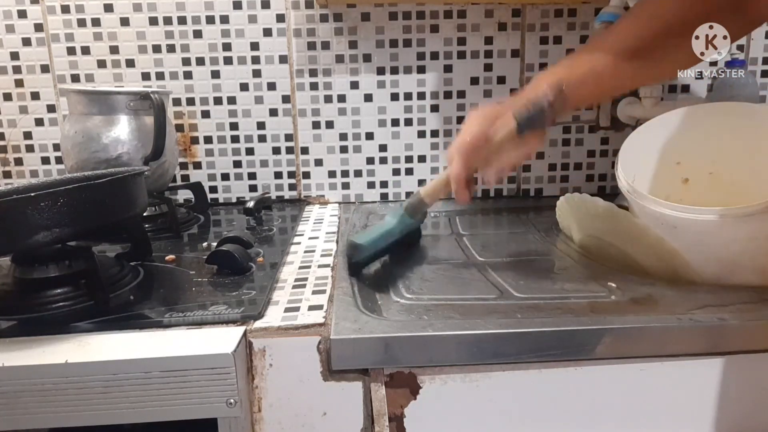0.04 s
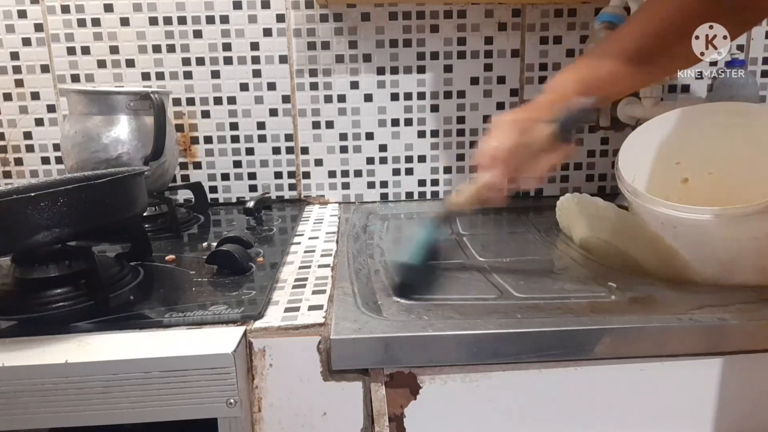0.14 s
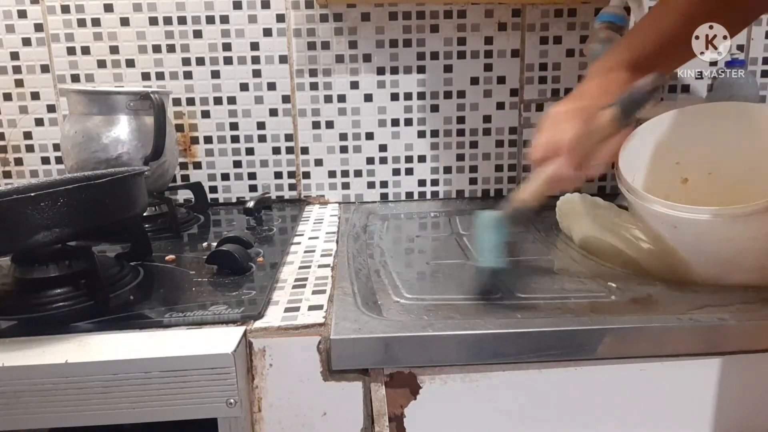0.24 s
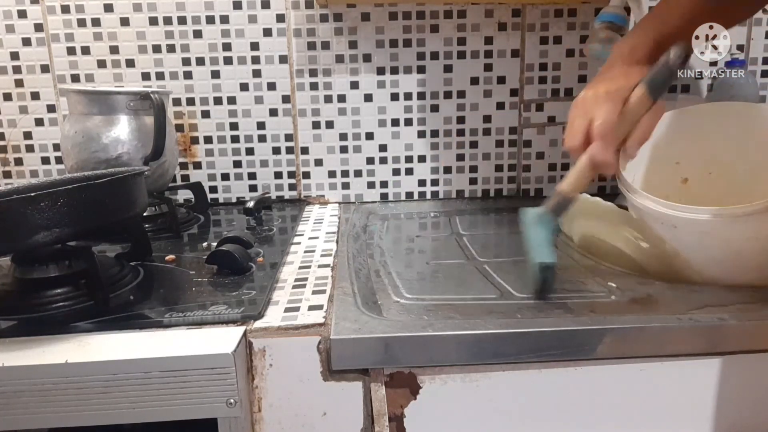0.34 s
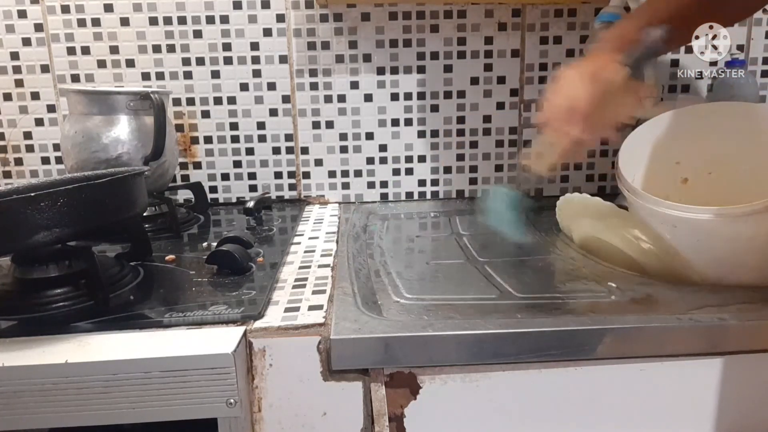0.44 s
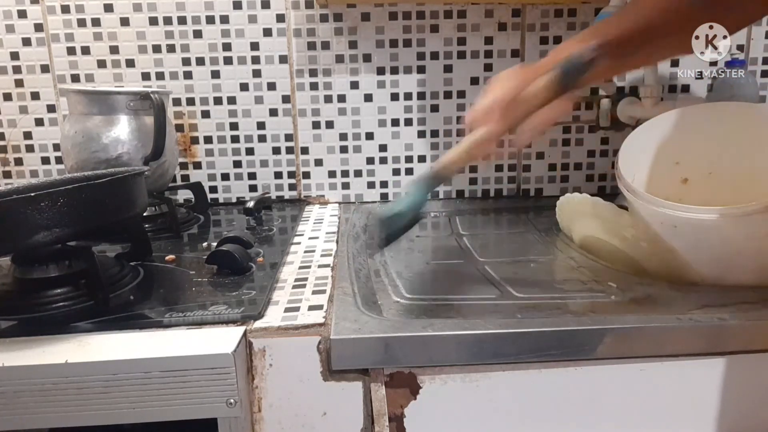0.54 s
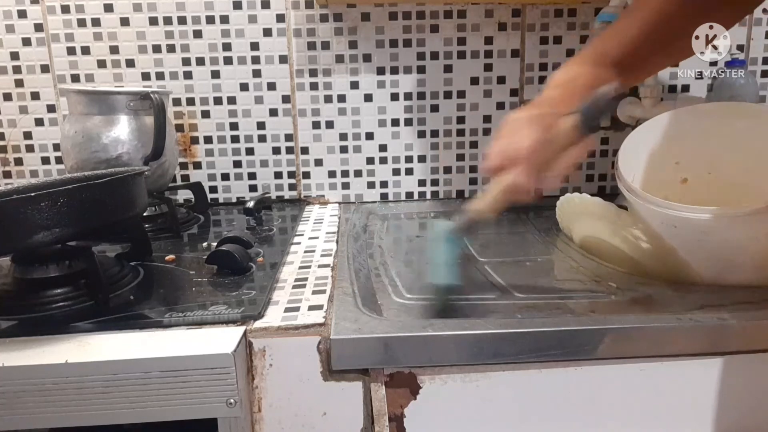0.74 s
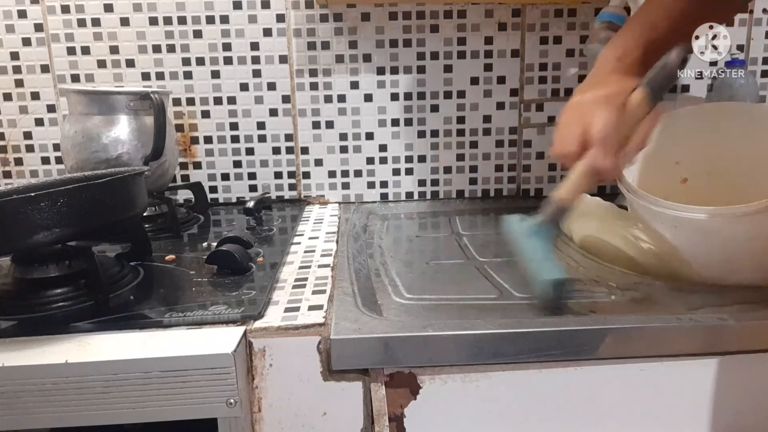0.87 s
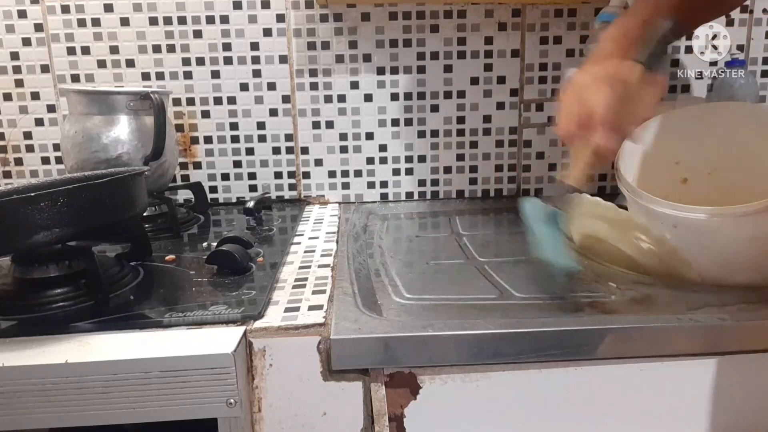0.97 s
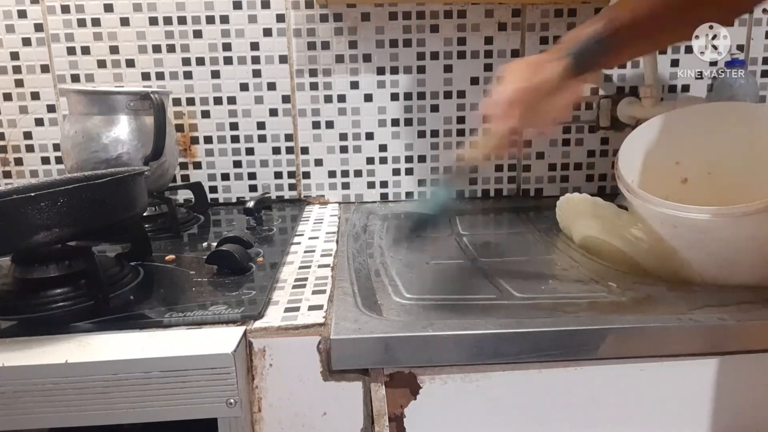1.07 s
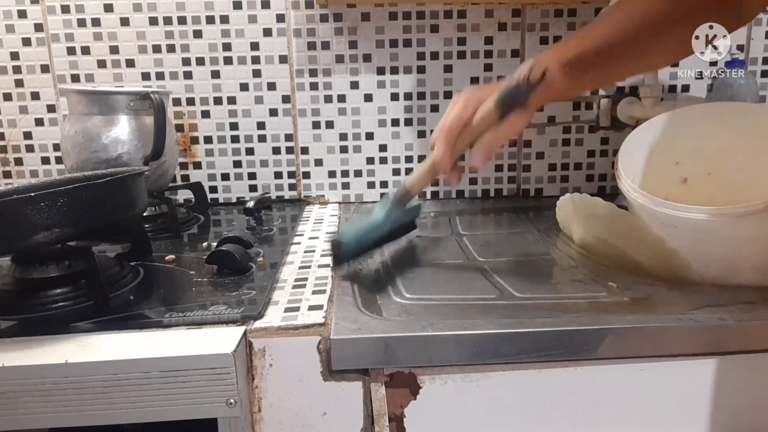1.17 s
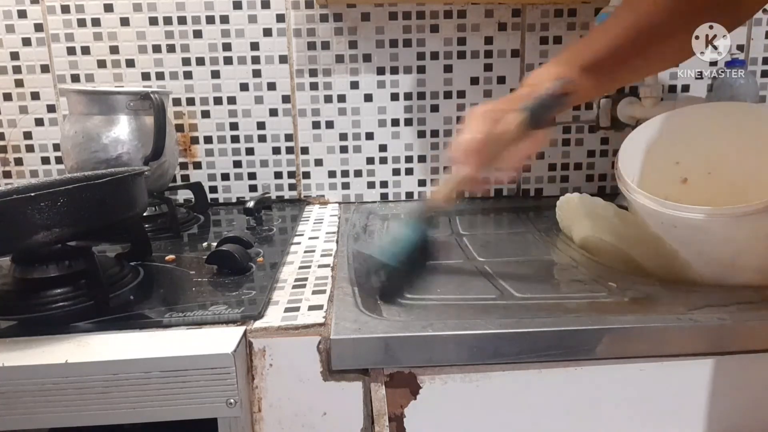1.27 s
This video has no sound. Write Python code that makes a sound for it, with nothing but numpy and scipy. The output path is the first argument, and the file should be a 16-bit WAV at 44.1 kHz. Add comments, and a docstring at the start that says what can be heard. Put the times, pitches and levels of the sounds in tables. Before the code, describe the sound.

Close up in a quiet, hard-walled kitchen, a wet rubber blade gives a lower squeak, stutters over ridged sheet steel, swishes back lightly, then squeaks higher and bumps harder on a second stroke.

```python
"""Squeegee on a wet steel drainboard

A rubber squeegee is pulled twice across a wet steel drainboard in a small tiled kitchen.
In each stroke the blade lands, hisses through the water film, squeaks in a low and a high stick-slip
mode, then judders over the ribs and shakes the sheet. It swishes lightly on the way back.
Squeaks are fluttering harmonic tones, water and impacts are shaped noise, the sheet is a bank of modes."""
import sys
import numpy as np
from scipy import signal
from scipy.fft import rfft, irfft
from scipy.io import wavfile
from scipy.ndimage import uniform_filter1d

SR = 44100
rng = np.random.default_rng(int(sys.argv[2]) if len(sys.argv) > 2 else 0)


def int16_out(signal):
    """Quantize to a 16-bit WAV file."""
    q = np.round(np.clip(np.atleast_2d(signal).T, -1, 1) * 32767)
    wavfile.write(sys.argv[1], SR, q.astype(np.int16))


N = 57330
T = np.arange(N) / SR  # time in s
HZ = np.fft.rfftfreq(2 * N, 1 / SR)  # bins of the zero-padded spectrum


def amp(db):
    """Decibel law: 20 dB is a tenfold amplitude."""
    return 10 ** (np.asarray(db) / 20)


def unit(x):
    """Power normalisation: scales to rms 1."""
    return x / np.sqrt(np.mean(x ** 2) + 1e-20)


def read(points, hz):
    """Interpolation of a curve on a logarithmic frequency axis."""
    f, value = np.transpose(points)
    return np.interp(np.log(hz + 1), np.log(f + 1), value)


def level(points):
    """Amplitude envelope from a curve that is piecewise linear in decibels."""
    return amp(np.interp(T, *np.transpose(points)))


def shape(x, gain):
    """Linear filtering: multiplies the zero-padded spectrum by a gain per frequency."""
    return irfft(rfft(x, 2 * N) * gain)[..., :N]


def colour(x, points):
    """Minimum-phase filter: the Hilbert transform of log gain gives its phase; output at rms 1."""
    log_gain = np.log(amp(read(points, HZ)))
    mirrored = np.r_[log_gain, log_gain[-2:0:-1]]
    gain = np.exp(signal.hilbert(mirrored).conj())[:N + 1]
    return unit(shape(x, gain))


def pan(db):
    """Interaural level difference: left and right gains, half of it on each side."""
    return amp(np.array([[.5], [-.5]]) * db)


def wander(hz):
    """Band-limited random modulation: low-passed Gaussian noise at rms 1."""
    return unit(shape(rng.standard_normal(N), 1 / (1 + (HZ / hz) ** 4)))


def burst(start, db, rise, decay):
    """Transient envelope: sine-squared rise, then exponential decay by 1/e per decay time."""
    age = T - start
    attack = np.sin(np.pi / 2 * np.clip(age / rise, 0, 1)) ** 2
    return amp(db) * attack * np.exp(-np.maximum(age - rise, 0) / decay)


def room(x, db):
    """Reverberation: sparse reflections of the tiles, decaying by frequency, differ at each microphone."""
    # reverberation time of the tiled room: frequency_hz, t60_s
    reverb_times = [(100, .35), (600, .21), (1000, .18), (2000, .27), (6000, .28), (15000, .2)]
    taps = rng.standard_normal((2, SR // 2)) * (rng.random((2, SR // 2)) < .1)
    taps[:, :SR // 400] = 0  # first 2.5 ms stay free of reflections
    hz, t, z = signal.stft(taps, SR, nperseg=256)
    decay = amp(-60 * t / read(reverb_times, hz)[:, None])
    tail = signal.istft(z * decay, SR)[1]
    tail /= np.linalg.norm(tail, axis=1, keepdims=True)
    return x + amp(db) * signal.fftconvolve(np.atleast_2d(x), tail, axes=1)[:, :N]


def kitchen():
    """Ambient noise: a diffuse part for each ear plus a stronger coherent part, quiet and steady."""
    # background spectrum: frequency_hz, density_db (per Hz, relative)
    floor_spectrum = [(25, -11.5), (60, 2.5), (88, 1), (130, 0), (280, -3), (600, -9.5), (1400, -19.5),
                      (2300, -21.5), (4000, -26.5), (7000, -14), (9000, -18.5), (15000, -18)]
    noise = rng.standard_normal((2, N)) + 2.1 * rng.standard_normal(N)
    return colour(noise, floor_spectrum) * amp(-75) * pan(db=3)


def flexing():
    """Modal excitation: the lowest mode of the sheet booms softly as the sheet flexes under the blade."""
    # flexes of the sheet: start_s, level_db, rise_s, decay_s
    flexes = [(0, -79, .02, .04), (0.099, -71.5, .012, 0.03), (0.279, -67.5, .015, 0.032),
              (0.334, -68, 0.022, 0.047), (0.602, -79, .03, 0.089), (0.709, -49, 0.047, 0.022),
              (0.887, -61, .018, 0.05), (1.028, -62.5, 0.015, 0.032), (1.257, -71, .02, 0.066)]
    mode_hz = 87.7
    boom = 0
    for row in flexes:
        boom = boom + burst(*row) * np.sqrt(2) * np.sin(2 * np.pi * mode_hz * (T - row[0]))
    return boom * pan(8.5)


def judder():
    """Stick-slip friction: uneven slips of either sign, mixed with noise, as the blade crosses the ribs."""
    # judder over the ribs: time_s, level_db (relative)
    judder_curve = [(0, -78), (.09, -79.5), (.115, -61.5), (.165, -73.5), (.19, -55), (.22, -56.5),
                    (.265, -68.5), (.295, -41), (.325, -48.5), (.36, -47.5), (.4, -65.5), (.47, -87.5),
                    (.53, -106), (.7, -85), (.738, -65.5), (.755, -51), (.79, -60), (.82, -67),
                    (.855, -55.5), (.885, -47), (.905, -36), (.925, -53), (.965, -54.5), (1.01, -72.5),
                    (1.06, -81), (1.16, -76), (1.235, -76.5), (1.27, -63), (1.3, -72)]
    # response of the sheet to slips: frequency_hz, density_db (per Hz, relative)
    body_spectrum = [(30, -26), (60, -22), (90, -11), (125, -6.5), (180, -5), (300, 4.5), (420, 2.5),
                     (520, -1.5), (800, -7), (1200, -5), (1600, -12), (2600, -11.5), (5000, -23.5),
                     (15000, -55)]
    slip_hz, slip_spread_db = 420, 2  # median rate, standard deviation of strength
    turns = np.cumsum(slip_hz * np.exp(.7 * wander(slip_hz))) / SR
    slips = np.diff(np.floor(turns), prepend=0)  # one impulse per completed turn
    slips = slips * amp(slip_spread_db * rng.standard_normal(N)) * rng.choice([-1, 1], N)
    friction = unit(slips) + .4 * rng.standard_normal(N)
    return colour(friction, body_spectrum) * level(judder_curve) * amp(1)


def knocking():
    """Impact excitation: a very short rise gives the squeegee's knocks on the steel a wide band."""
    # knocks: start_s, level_db (relative), decay_s
    knocks = [(0.0938, -51.5, 0.0071), (.114, -65, .01), (.741, -56.5, 0.0059), (0.9, -44.5, 0.0032),
              (1.248, -66, 0.01)]
    # knock spectrum: frequency_hz, density_db (per Hz, relative)
    knock_spectrum = [(60, -12), (300, -1.5), (600, 6.5), (1100, 0.5), (1700, -7.5), (2600, -8),
                      (5000, -13), (15000, -30.5)]
    envelope = sum(burst(s, db, 0.00034, decay) for s, db, decay in knocks)
    return colour(rng.standard_normal(N), knock_spectrum) * envelope


def bumping():
    """Soft contact: the slower rise and low band of compliant rubber bumping over the ribs."""
    # bumps: start_s, level_db (relative), decay_s
    bumps = [(0.181, -52, .015), (.284, -44.5, 0.0079), (.349, -45.5, 0.02), (0.747, -45, .012),
             (.762, -51, 0.011), (.897, -38.5, 0.0087)]
    # bump spectrum: frequency_hz, density_db (per Hz, relative)
    bump_spectrum = [(50, -32), (130, -17), (220, -2), (330, 1), (450, -4), (700, -16), (1500, -35),
                     (15000, -70)]
    envelope = sum(burst(s, db, .006, decay) for s, db, decay in bumps)
    return colour(rng.standard_normal(N), bump_spectrum) * envelope


def drainboard():
    """Modal resonance: slips, knocks and bumps drive decaying sines, the modes of the steel sheet."""
    # ringing modes: frequency_hz, level_db (relative), t60_s
    modes = [(182, -3.5, 0.15), (245, -9.5, .2), (324, -6.5, 0.17), (334, -2, 0.48), (347, -7, 0.06),
             (432, 0, .18), (594, -10.5, 0.6), (730, 0.5, .15), (890, 6.5, .2), (980, -6.5, .18),
             (2160, -7, 0.44)]
    force = judder() + knocking() + bumping()
    response = sum(amp(db - 60 * T / t60) * np.sin(2 * np.pi * hz * T) for hz, db, t60 in modes)
    ringing = unit(signal.fftconvolve(force, response)[:N])
    steel = force + amp(-14.5) * np.std(force) * ringing  # ring level relative to the force
    return room(steel * amp(-2.5), -8) * pan(5)


def splashback():
    """Early reflections: a dense decaying echo off steel and tiles colours the direct sound as a comb."""
    echo_db, decay_s = -6, 0.018  # level against the direct sound, time to 1/e
    close = rng.standard_normal((2, N)) * np.exp(-T / decay_s)
    comb = 1 + amp(echo_db) * rfft(close / np.linalg.norm(close[0]), 2 * N)
    return comb / np.hypot(1, amp(echo_db))


def water():
    """Turbulence and bursting drops: hiss under the blade, light swishes and flicks of spray."""
    # blade sweeping the water film: time_s, level_db (relative)
    sweep = [(0, -87), (.088, -78.5), (.11, -71), (.15, -74), (.165, -63), (.19, -60.5), (.25, -54),
             (.315, -51.5), (.37, -58), (.41, -63), (.46, -76), (.55, -79.5), (.7, -74.5), (.739, -66.5),
             (.742, -60), (.77, -60), (.83, -56.5), (.91, -54), (.965, -59.5), (1.01, -69.5), (1.11, -79),
             (1.23, -84.5), (1.27, -78), (1.3, -79)]
    # light swishes of the blade skimming the water: start_s, level_db (relative), rise_s, decay_s
    swishes = [(0.561, -58.5, 0.016, .03), (0.584, -64.5, .015, .04), (.64, -73, 0.029, .05),
               (1.014, -61, 0.022, .04)]
    # water flicked off the blade: start_s, level_db, rise_s, decay_s
    sprays = [(0.288, -44.5, 0.0036, 0.022), (0.499, -51.5, 0.00049, .0012), (0.502, -66, .002, 0.054),
              (0.689, -61.5, 0.021, .06)]
    # spectra of film, swishes and spray: frequency_hz, density_db (per Hz, relative)
    film_spectrum = [(300, -14.5), (1000, -3), (1700, -7), (2400, 1), (3700, 4), (4900, 1), (6500, 2.5),
                     (7700, 0.5), (8600, -8), (10000, -4), (12500, -3.5), (15500, -9.5)]
    swish_spectrum = [(800, -22.5), (1700, -18.5), (2400, -6.5), (3000, -7.5), (3650, 3.5), (4700, -3.5),
                      (6000, -1.5), (7400, -3.5), (8600, -9), (12500, -6.5), (15500, -17)]
    spray_spectrum = [(2000, -26), (7000, -4), (9500, -9.5), (12300, 1.5), (15500, -6)]
    # stereo balance of the water: frequency_hz, left_minus_right_db
    water_pan = [(100, 3.5), (1200, 7.5), (4500, 4), (7500, 0.5), (10000, -3), (15000, -8)]
    drops_per_s, drop_spread_db = 5000, 2.5
    strength = amp(drop_spread_db * np.minimum(rng.exponential(1, N), 4))
    drops = rng.standard_normal((2, N)) * strength * (rng.random(N) < drops_per_s / SR)
    fizz = rng.standard_normal((2, N)) + amp(-6) * unit(drops)
    film = colour(fizz, film_spectrum) * level(sweep) * amp(5)
    # the reversed fizz is uncorrelated with the film
    swish = colour(fizz[:, ::-1], swish_spectrum) * sum(burst(*row) for row in swishes) * amp(2.5)
    spray = colour(rng.standard_normal((2, N)), spray_spectrum) * sum(burst(*row) for row in sprays)
    return shape(film + swish + spray, pan(read(water_pan, HZ)) * splashback())


def squeak(curve, partials_db, rasp, hop):
    """Stick-slip oscillation: harmonics flutter in pitch and strength as the rubber's grip loosens."""
    jitter, shimmer, flutter_hz = .035, 0.87, 132  # pitch and strength deviation (fractions) at roughness 1
    rasp_hz, chatter_hz = 80, 65
    s, *columns = np.transpose(curve)
    hz, db, overtone_db, rough = (np.interp(T, s, c) for c in columns)
    phase = 2 * np.pi * np.cumsum(hz * (1 + jitter * rough * wander(flutter_hz))) / SR
    gate = uniform_filter1d(1. * ((T > s[0]) & (T < s[-1])), size=200)
    tone = 0
    for k, partial_db in enumerate(partials_db):
        # complex noise, stronger on each higher partial, roughens strength and phase
        grain = k * rasp * (wander(rasp_hz) + 1j * wander(rasp_hz))
        flutter = 1 + shimmer * rough * wander(flutter_hz) + grain
        partial = (flutter * np.exp(1j * (k + 1) * phase)).imag / np.hypot(1, k * rasp)
        tone = tone + amp(partial_db + overtone_db * (k > 0)) * partial
    chatter = 1 - hop * rough * np.cos(2 * np.pi * chatter_hz * (T - s[0]))  # the loosening blade hops
    return np.sqrt(2) * gate * amp(db) * tone * chatter / np.hypot(1, rough)


def squeaks():
    """Coupled resonance: both blade modes beat against the sheet and reach two microphones out of step."""
    # squeak curves, one per stroke: time_s, pitch_hz, level_db, overtone_db, roughness (0-1)
    low_curves = [
        [(.177, 580, -60, 2, .2), (.189, 588, -45, 0, .2), (.197, 596, -42, 4, .2), (.207, 608, -30, 1, .15),
         (.222, 602, -23, -1, .15), (.238, 605, -20.5, -2, .1), (.262, 610, -25, 2, .15),
         (.283, 610, -36, 2, .4), (.295, 615, -53, 0, .5), (.32, 645, -43, -3, .3), (.335, 650, -62, 0, .5)],
        [(.775, 618.4, -67, -7, 0.5), (.793, 608, -49.5, -12.5, .3), (.815, 610, -65.5, -16.5, 0.2),
         (.838, 595.3, -50.5, -4, .05), (.865, 598, -41, -3, .05), (.885, 596, -49.5, 10.5, 0),
         (.9, 600, -47, -21, 0.5)],
    ]
    high_curves = [
        [(.218, 1040, -64, -10, .3), (.264, 1070, -47, -6, .3), (.277, 1110, -42, 7, .15),
         (.287, 1120, -37, -6, .5), (.302, 1100, -40, -8, .6), (.314, 1090, -53, 4, .7),
         (.326, 960, -49, -12, .4), (.347, 975, -42, -15, .3), (.36, 950, -52, -10, .5),
         (.39, 950, -54, -12, .4), (.41, 950, -70, -12, .4)],
        [(.795, 1030, -58, -10, .1), (.814, 1027, -37.5, -5, .03), (.83, 1034, -31, -1, .03),
         (.85, 1046, -31.5, 8, .03), (.864, 1056, -32, 8, .05), (.872, 1080, -32, 3, .5),
         (.88, 1100, -28.5, -2, .35), (.889, 1135, -33, 1, .6), (.898, 1115, -31, -10, .6),
         (.91, 1070, -41, 0, .9), (.926, 975, -29.5, -9, .4), (.942, 1000, -28.5, -24, .55),
         (.962, 965, -42, -16, .6), (.995, 960, -58, -8, .4), (1.012, 990, -61, -16, .2),
         (1.045, 1020, -64, -18, .2), (1.06, 1030, -78, -18, .2)],
    ]
    # strengths of the harmonics, fundamental first: level_db (relative)
    low_partials = [-2.5, -18.5, -29, -24, -31, -35]
    high_partials = [-0.5, -2, -19.5, -40.5]
    # sheet modes that sing along: frequency_hz, width_hz, level_db (relative)
    singing_modes = [(655, 60, -4), (980, 20.7, -9), (1182, 25, -8.5), (1260, 11, -8.5), (2300, 12, -11.5),
                     (2217, 30, -16), (2260, 30, -17.5)]
    # phase between the microphones: frequency_hz, left_lead_rad
    phase_lead = [(20, 0), (600, -.6), (980, -2.3), (1040, -2.0), (1120, -.9), (1250, -.6), (2100, -.6),
                  (3200, -2.4), (16000, -6)]
    low = sum(squeak(c, low_partials, rasp=.22, hop=.3) for c in low_curves)
    high = sum(squeak(c, high_partials, rasp=.05, hop=1.0) for c in high_curves)
    sheet = sum(amp(db) / (1 + 2j * (HZ - hz) / width) for hz, width, db in singing_modes)
    direct = np.exp(np.array([[.5j], [-.5j]]) * read(phase_lead, HZ))
    pair = shape(low + high, direct + sheet)
    return room(pair, -11.5) * pan(2.2)


def scene():
    """Superposition: room background, steel, water and squeaks add linearly."""
    return kitchen() + flexing() + drainboard() + water() + squeaks()


def record(dry):
    """Band limitation: a linear-phase low-pass removes the top of the spectrum."""
    edge_hz = 15600
    lowpass = signal.firwin(511, edge_hz, window=("kaiser", 9), fs=SR)
    return signal.oaconvolve(dry, lowpass[None], "same")


dry = scene()
out = record(dry)
int16_out(out)
```